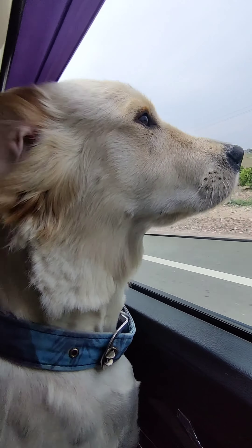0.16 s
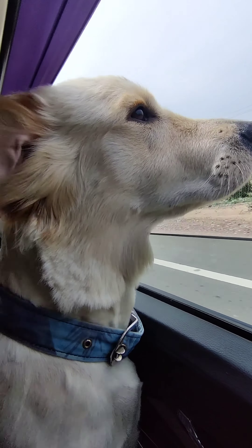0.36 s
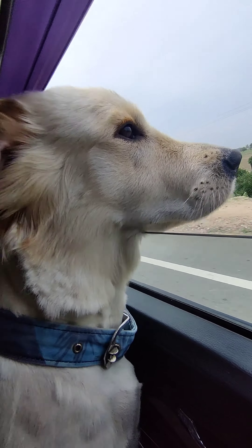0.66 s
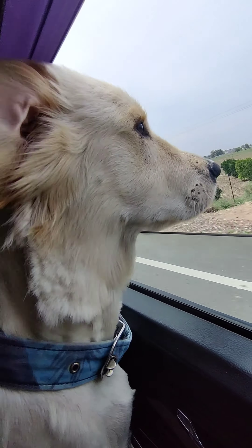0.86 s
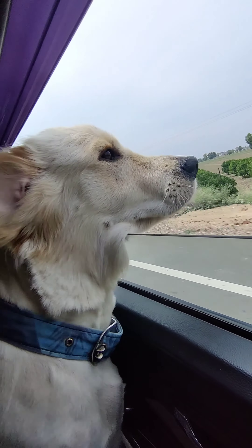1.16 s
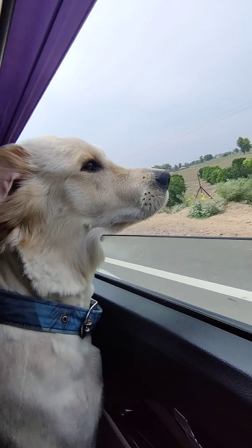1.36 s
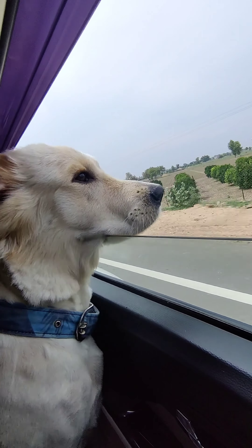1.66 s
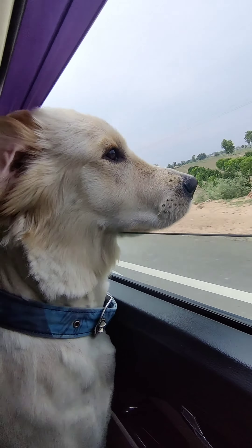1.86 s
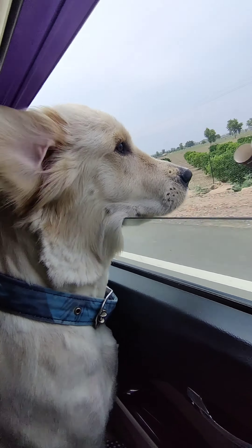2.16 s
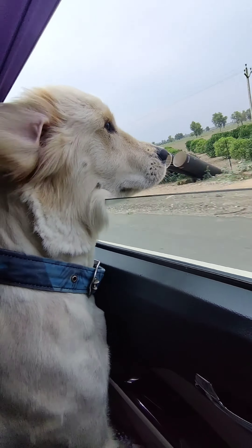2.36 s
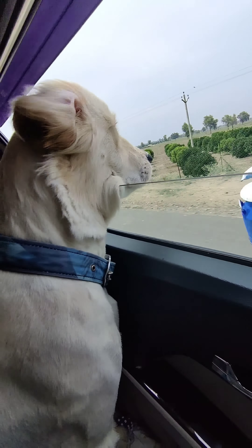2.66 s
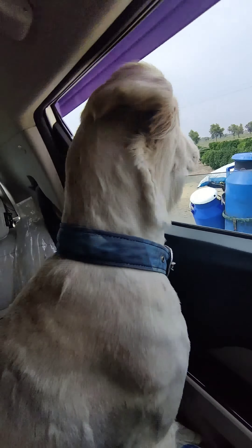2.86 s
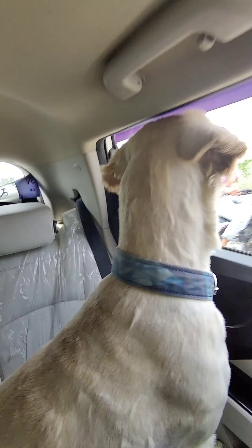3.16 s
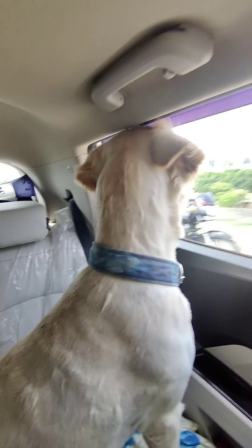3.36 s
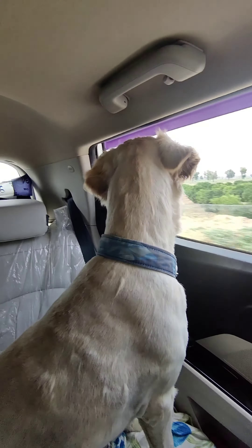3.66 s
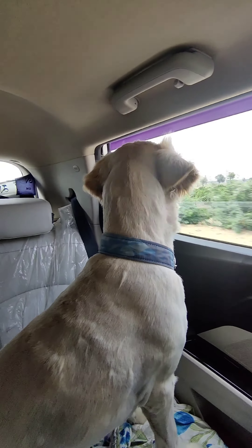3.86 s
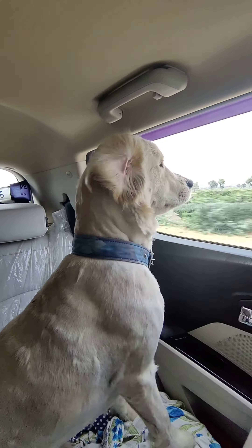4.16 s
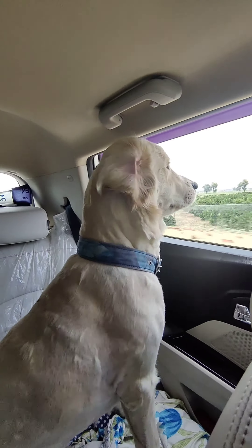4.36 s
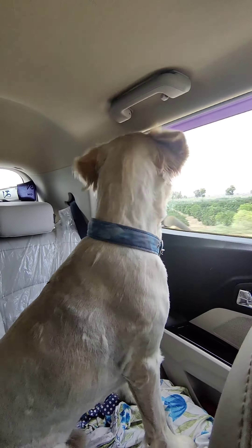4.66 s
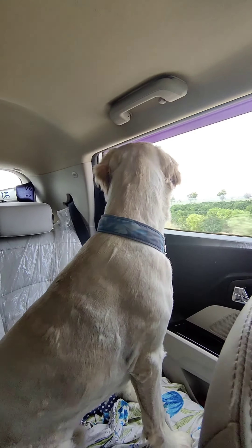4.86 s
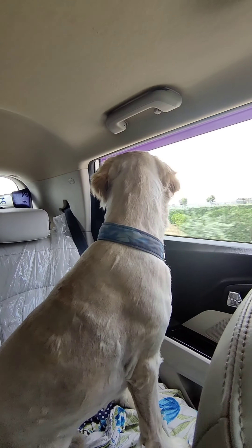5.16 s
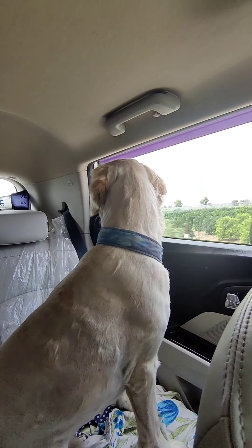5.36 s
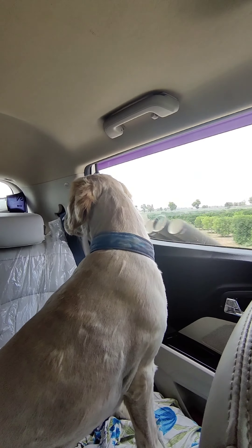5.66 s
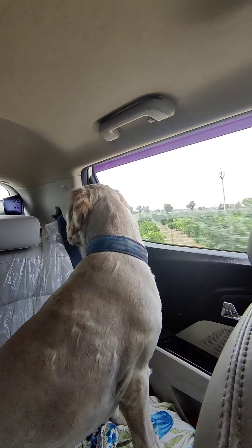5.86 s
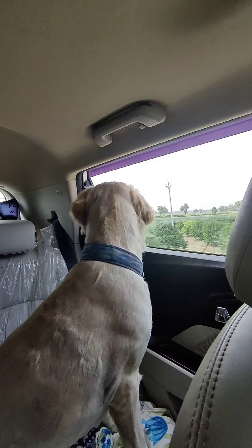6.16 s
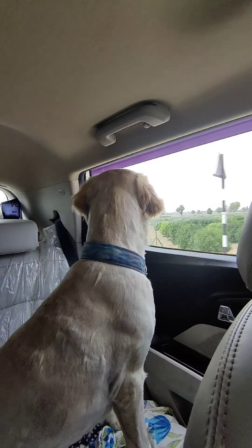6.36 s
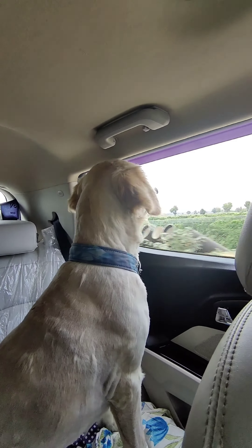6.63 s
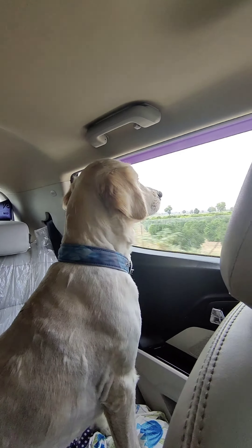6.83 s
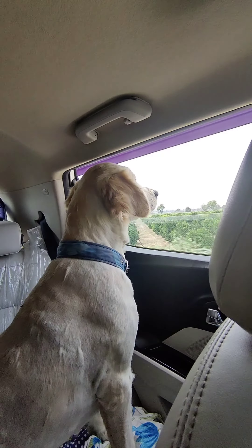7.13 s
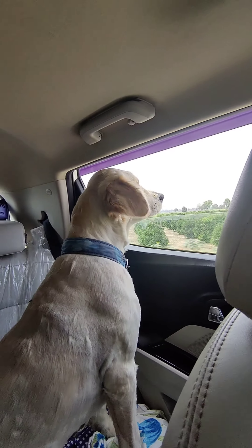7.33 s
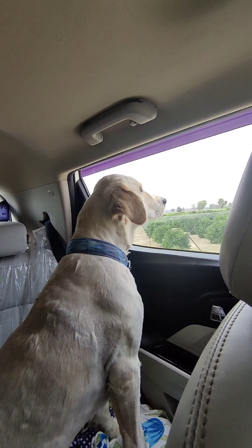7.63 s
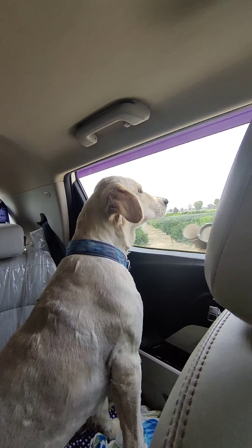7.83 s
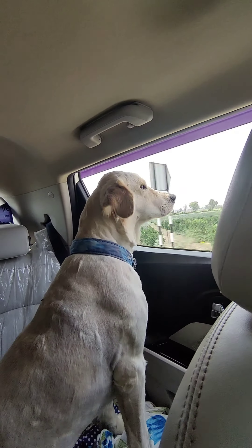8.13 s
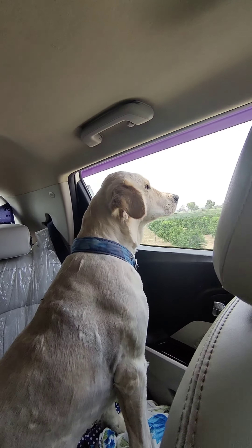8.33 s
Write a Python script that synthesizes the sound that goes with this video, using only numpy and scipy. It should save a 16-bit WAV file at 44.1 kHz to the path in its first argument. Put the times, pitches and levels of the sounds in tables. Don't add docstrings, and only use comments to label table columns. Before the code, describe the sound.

Inside a moving car beside an open window, heavy low wind throbs and buffets over tyre roar and hiss. A farm diesel outside grows to a droning, rattling peak around three seconds, then falls away. The cabin becomes duller, with pulsing air and a few dry trim ticks. Wind returns somewhat near the end, with a brief dog's nose puff. A close handheld stereo phone captures it.

```python
import sys
import numpy as np
from scipy import signal
from scipy.fft import rfft, irfft, next_fast_len
from scipy.io import wavfile
from scipy.ndimage import uniform_filter1d, minimum_filter1d, map_coordinates

SR = 44100
rng = np.random.default_rng(int(sys.argv[2]) if len(sys.argv) > 2 else 0)


def unload_audio(sound):
    columns = np.transpose(np.atleast_2d(sound))
    steps = np.round(np.clip(columns, -1, 1) * 32767)
    wavfile.write(sys.argv[1], SR, steps.astype(np.int16))


def to_linear_factor(level_db):
    exponent = np.asarray(level_db, float) / 20
    return 10 ** exponent


N = 374407


def unit(x):
    return x / np.sqrt(np.mean(x ** 2) + 1e-20)


def along(points, hz):
    f, v = np.transpose(points)
    return np.interp(np.log(hz + 1), np.log(f + 1), v)


def curves(rows):
    s, *cols = np.transpose(rows)
    return [np.interp(np.arange(N) / SR, s, c) for c in cols]


def until(s, fade):
    return np.clip((s - np.arange(N) / SR) / fade, 0, 1)


def wobble(rate):
    coarse = np.arange(0, N + 32, 32)
    knots = rng.standard_normal(int(N * rate / SR) + 4)
    return np.interp(np.arange(N), coarse, map_coordinates(knots, [coarse * rate / SR]))


def swells(rows):
    t = np.arange(0, N + 64, 64) / SR
    gain = sum(to_linear_factor(db) * np.exp(-2 * ((t - s) / half) ** 2) for s, half, db in rows)
    return np.interp(np.arange(N) / SR, t, gain)


def filtered(x, response):
    m = next_fast_len(x.shape[-1] + 8192, True)
    spectrum = rfft(x, m) * response(np.fft.rfftfreq(m, 1 / SR))
    return irfft(spectrum, m)[..., :x.shape[-1]]


def ringing(x, modes, soft_hz):
    def response(f):
        ring = sum(to_linear_factor(db) * 1j * f * w / (c * c - f * f + 1j * f * w) for c, w, db in modes)
        return ring / (1 + 1j * f / soft_hz) ** 2
    return unit(filtered(x, response))


def spells(x, rows):
    out, t = np.zeros(N), np.arange(N) / SR
    for s, half, hz, width, db in rows:
        near = np.abs(t - s) < 2 * half
        swell = to_linear_factor(db) * np.exp(-2 * ((t[near] - s) / half) ** 2)
        broad = ringing(x[near], [(hz, 2 * width, 0)], hz)
        out[near] += swell * ringing(broad, [(hz, width, 0)], 2 * hz)
    return out


def patchy(pair, depth_db):
    z = signal.stft(pair, nperseg=512)[2]
    field = uniform_filter1d(rng.standard_normal(z.shape[1:]), size=6, axis=0)
    field = uniform_filter1d(field, size=10, axis=1)
    gain = to_linear_factor(np.clip(depth_db, 0, 2.2) * unit(field)).astype(np.float32)
    return signal.istft(z * gain, nperseg=512)[1]


def rush(spectrum, alike, patchy_db=None):
    pair = rng.standard_normal((2, N + 512), dtype=np.float32)
    if patchy_db is not None:
        pair = patchy(pair, patchy_db)
    mid, side = filtered(pair[:, :N].astype(float), lambda hz: to_linear_factor(along(spectrum, hz)))
    turn = np.arccos(np.clip(alike, 0, 1)) / 2
    mid, side = np.cos(turn) * mid, np.sin(turn) * side
    return unit(np.array([mid + side, mid - side]))


# (time [s], level [dB])
GUST = [(0, -5), (.3, -.5), (1, 0.2), (2.2, 2.5), (2.6, -1), (3.5, -.5), (4.15, -2.5), (4.35, -9),
        (4.6, -11), (5.1, -13), (5.45, -10), (5.75, -10), (6, -9.5), (6.7, -5), (7.3, -6), (7.7, -4),
        (8, -5), (8.49, -3)]
# (time [s], pitch [Hz])
SWAY = [(0, 13.3), (2, 13.8), (3.4, 21), (3.9, 24), (4.25, 15.3), (5.2, 12.2), (6, 16), (6.9, 21),
        (7.5, 18.4), (8.49, 17)]
# (time [s], half length [s], level [dB])
SURGES = [(.99, .05, -18), (1.89, .12, -18), (3.62, .1, -14), (4.24, .12, -8), (4.49, .07, -10),
          (4.83, .12, -8.5), (5.13, .08, -10), (5.5, .12, -20), (6.6, .15, -21), (6.85, .15, -26),
          (8.36, .07, -18)]
# (time [s], half length [s], level [dB])
EDDIES = [(.12, .05, -12), (.31, .1, -16), (.9, .04, -24), (1.14, .12, -15), (2.65, .15, -21),
          (2.95, .07, -16), (3.62, .09, -14), (3.92, .1, -17), (5.3, .09, -24), (5.96, .08, -22),
          (6.46, .15, -21), (7.69, .05, -22), (8.04, .08, -18), (8.4, .12, -14.5)]
# (frequency [Hz], density [dB per Hz])
HEAVE = [(3, -120), (6, -16), (10, 0), (18, -1.5), (30, -5.5), (45, -39.5), (80, -120)]
BUFFET = [(10, -64), (20, 12), (30, 0), (45, 4), (65, -4), (90, -3), (125, -51.5), (200, -120)]
RUSH = [(53, 2), (90, -1), (113, -7), (204, -10.5), (269, -18), (296, -16), (600, -34.5), (870, -29),
        (1320, -120)]


def wind():
    gust_db = curves(GUST)[0]
    pitch = curves(SWAY)[0] * (1 + .3 * wobble(16))
    throb = to_linear_factor(2.5 + 2.9 * wobble(9)) * np.sin(2 * np.pi * np.cumsum(pitch) / SR)
    throb = throb + .55 * rush(HEAVE, .75)
    broken = np.clip(1 - .6 * swells([(s, half, 0) for s, half, _ in EDDIES]), 0, 1)
    throb = (to_linear_factor(-16.5) * broken + swells(SURGES)) * throb
    buffet = (to_linear_factor(-25 + 1.1 * gust_db) + swells(EDDIES)) * rush(BUFFET, 1.0)
    air = to_linear_factor(-20 + gust_db + 1.5 * wobble(18)) * rush(RUSH, 0.89)
    return throb + buffet + air


# (time [s], level [dB])
OPEN = [(0, -3), (1.1, -2), (2.3, 0.2), (3.5, 0), (4.2, -2.5), (4.33, -7), (4.6, -11.5), (5, -13.5),
        (5.8, -14), (6.3, -12.5), (7.1, -10.5), (7.4, -7.5), (8.1, -5.5), (8.42, -5), (8.49, -1.5)]


def openness():
    return curves(OPEN)[0]


# (frequency [Hz], density [dB per Hz])
ROAR = [(260, -43), (450, -6), (760, -14), (860, -3.5), (1100, -10.5), (1650, -13.5), (2650, -15.5),
        (2900, -34), (4160, -63.5), (7040, -120)]
HISS = [(1650, -65), (2600, -5), (3000, -2), (4800, -6.5), (6250, -3), (6800, -8), (7600, -19.5),
        (10100, -23), (13000, -40), (15500, -44.5), (15900, -120)]
# (time [s], half length [s], frequency [Hz], width [Hz], level [dB])
WHINES = [
    (4.984, 0.36, 2840, 39.3, -64.5),
    (6.705, 2, 1266, 30.1, -62.5),
]


def road():
    open_db = openness()
    roar = to_linear_factor(-42.5 + .95 * open_db) * rush(ROAR, .4, patchy_db=1)
    hiss = to_linear_factor(-53.5 + .97 * open_db) * rush(HISS, 0.2)
    return roar + hiss + spells(rng.standard_normal(N), WHINES)


# (time [s], rate [firings per s])
SPEED = [(0, 49.7), (.75, 49.81), (1.25, 49.94), (1.75, 49.88), (2.25, 49.76), (2.75, 49.55), (3.2, 49.33),
         (6.4, 49.34)]


def firing():
    cycles = np.cumsum(curves(SPEED)[0]) / SR
    cycles = cycles - cycles[round(2.493 * SR)] % 1 + 1
    cycles = cycles + .004 * wobble(40)
    strength = to_linear_factor(0.59 * wobble(45))
    pulses = (np.diff(np.floor(cycles), prepend=1) > 0) * strength
    puff = strength * np.exp(-(cycles % 1) / 0.17)
    return pulses, puff


PASSING = {"boom": (2.4, 1.2, 1.05, -17.5, 17), "silencer": (2.2, .9, .65, -19, 21),
           "pipe": (3.19, .48, .18, -25.5, 20), "rattle": (2.8, .6, .5, -31.5, 10),
           "clatter": (2.72, .36, .42, -31.3, 9.5), "sizzle": (2.82, .36, .36, -39, 11)}


def passing(part):
    abreast, approach, retreat, peak_db, fall_db = PASSING[part]
    t = np.arange(N) / SR - abreast
    return peak_db - fall_db * np.log10(1 + (t / np.where(t < 0, approach, retreat)) ** 2)


# (frequency [Hz], width [Hz], level [dB])
BOOM = [(100.6, 11.3, 3), (150, 30, 1.5), (197.2, 24, 2)]
SILENCER = [(246, 57, 24), (300, 40, 17), (485, 44, 6)]
SHELL = [(255, 120, 0)]
PIPE = [(650, 80, -12), (858, 90, 8)]
MOUTH = [(835, 250, 0)]
# (time [s], half length [s], level [dB])
REFLECTED = [
    (2.45, .5, -32),
    (5.0, 1.2, -51),
]
# (time [s], half length [s], frequency [Hz], width [Hz], level [dB])
GLINTS = [(.5, .9, 355, 60, -39), (.6, 1.0, 430, 110, -37), (2.35, .3, 2300, 150, -41.5),
          (2.75, .35, 660, 110, -34), (3.15, .4, 345, 40, -36), (3.154, 0.27, 1070, 160, -42),
          (3.5, .3, 1190, 109, -39.5)]


def exhaust(pulses, puff):
    blast = unit(pulses) + 0.1 * unit(puff * rng.standard_normal(N))
    boom = ringing(pulses, BOOM, soft_hz=280)
    silencer = ringing(ringing(blast, SILENCER, soft_hz=700), SHELL, soft_hz=1500)
    pipe = ringing(ringing(blast, PIPE, soft_hz=1480), MOUTH, soft_hz=3000)
    out = to_linear_factor(passing("boom")) * boom + to_linear_factor(passing("silencer")) * silencer
    out = out - (to_linear_factor(passing("pipe")) + swells(REFLECTED)) * pipe
    out = out * to_linear_factor(.55 * openness()) + spells(blast, GLINTS)
    return np.array([out, out]) * until(6.39, .8)


# (time [s], half length [s], level [dB])
JOLTS = [(.725, .045, -38.5), (1.1, .12, -42), (1.75, .12, -49), (2.37, .08, -45), (3.45, .15, -45),
         (.2, .15, -54)]
# (frequency [Hz], density [dB per Hz])
RATTLE = [(290, -84), (450, -11.5), (600, -11.5), (820, -12.5), (1150, -16), (1750, -19), (2300, -23.5),
          (3000, -39.5), (3900, -65), (6600, -120)]
CLATTER = [(1470, -66), (2500, -12.5), (2910, -7), (3400, -13), (4010, -8), (4930, -12), (6340, -3),
           (6800, -4.5), (7400, -28), (9000, -80), (12000, -120)]
SIZZLE = [(5000, -120), (6800, -24), (7500, -7), (10000, -11), (12000, -15.5), (15500, -17), (15900, -120)]


def racket(puff):
    jolts = swells(JOLTS)
    knock = puff * to_linear_factor(1.8 * wobble(25))
    rattle = unit((1 + 0.5 * knock) * rush(RATTLE, 0.25, patchy_db=1.0))
    clatter = unit((1 + 1.6 * knock) * rush(CLATTER, 0.13, patchy_db=5.5))
    sizzle = unit((1 + .4 * knock) * rush(SIZZLE, 0.13, patchy_db=2.5))
    out = (to_linear_factor(passing("rattle")) + to_linear_factor(-1.5) * jolts) * rattle
    out = out + (to_linear_factor(passing("clatter")) + jolts) * clatter
    out = out + (to_linear_factor(passing("sizzle")) + to_linear_factor(-15) * jolts) * sizzle
    return out * to_linear_factor(1.45 * openness()) * until(5.1, .6)


# (time [s], rise [s], length [s], level [dB])
PUFFS = [
    (0.694, .04, 0.09, -53),
    (7.837, .05, 0.17, -43),
    (7.982, .02, 0.094, -53),
]
# (frequency [Hz], density [dB per Hz])
NOSE = [(700, -68), (1500, -9), (2150, -4), (3120, -11.5), (4940, -12), (6200, -5), (7000, -16),
        (8130, -20), (13000, -32), (16000, -86)]


def dog():
    t = np.arange(N) / SR
    swell = np.zeros(N)
    for s, rise, length, db in PUFFS:
        opening = np.clip((t - s) / rise, 0, 1)
        closing = np.clip((s + length - t) / (length - rise), 0, 1)
        swell += to_linear_factor(db) * opening * closing
    return swell * to_linear_factor(1.5 * wobble(60)) * rush(NOSE, .4)


# (time [s], peak level [dB])
TICKS = [
    (5.1444, -48),
    (5.2272, -39.5),
    (6.0684, -42),
    (7.2994, -59.5),
]
# (frequency [Hz], level [dB])
PLASTIC = [(800, -75), (2000, 2), (3000, 8), (5000, -4), (6300, -0.5), (7200, -7), (10000, -30),
           (14000, -76)]


def trim():
    out, t = np.zeros(N), np.arange(SR // 40) / SR
    for s, db in TICKS:
        out[round(s * SR):][:len(t)] += to_linear_factor(db - 3 - 60 * t / 0.032) * rng.standard_normal(len(t))
    return filtered(out, lambda hz: to_linear_factor(along(PLASTIC, hz) + 5))


# (time [s], lead of the left port [samples])
LEAD = [(0, 22.1), (3.2, 16.4), (3.8, 6.1), (8.5, 7.4)]


def late(x, share):
    delayed = np.arange(N) - share * curves(LEAD)[0]
    return np.array([x[0], np.interp(delayed, np.arange(N), x[1])])


# (frequency [Hz], left over right [dB])
LEFT_DB = [(60, -2.7), (200, 3), (700, 0), (2400, 3), (6000, 4.5), (9000, -3)]


def scene():
    pulses, puff = firing()
    outside = late(exhaust(pulses, puff), 0.66)
    outside = outside + late(racket(puff) + road() + dog() + trim(), 0.99)
    outside = filtered(outside, lambda hz: to_linear_factor(along(LEFT_DB, hz) * [[.5], [-.5]]))
    return outside + wind()


# (frequency [Hz], share of cells dropped [0-1])
LOST = [(1200, 0), (2000, .05), (3400, .13), (4200, .05), (5200, .09), (6600, .03), (7400, .5), (10000, .6),
        (15000, .75)]


def thinned(x):
    hz, _, z = signal.stft(np.pad(x, ((0, 0), (0, 2048)), "reflect"), SR, nperseg=1024)
    field = uniform_filter1d(rng.standard_normal(z.shape[1:]), size=5, axis=0)
    field = uniform_filter1d(field, size=5, axis=1)
    chance = (1 + np.tanh(.85 * unit(field))) / 2
    share = along(LOST, hz)[:, None]
    z = z * np.where(chance < share, .04, 1 / np.sqrt(1 - share))
    z = z + .51 * (hz > 7200)[:, None] * (z.mean(axis=0) - z)
    return signal.istft(z, SR, nperseg=1024)[1][:, :N]


def roll_off(x):
    return signal.sosfilt(signal.butter(12, 15650, fs=SR, output="sos"), x)


def record(dry):
    need = np.minimum(1, .6 / np.maximum(np.abs(dry).max(axis=0), 1e-6)) ** .6
    gain = uniform_filter1d(minimum_filter1d(need, size=1600), size=1600)
    mix = thinned(dry * gain)
    return roll_off(mix)


dry = scene()
out = record(dry)
unload_audio(out)
```